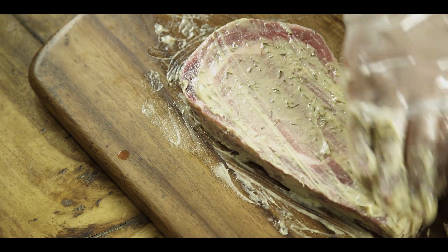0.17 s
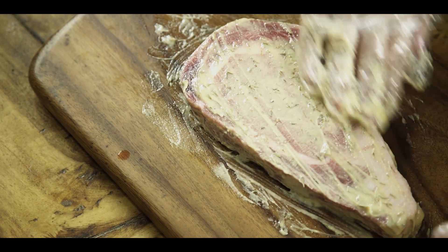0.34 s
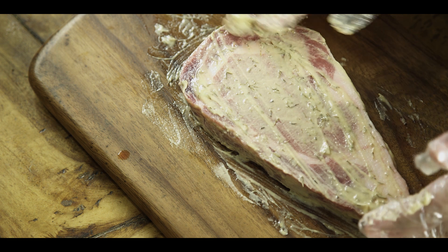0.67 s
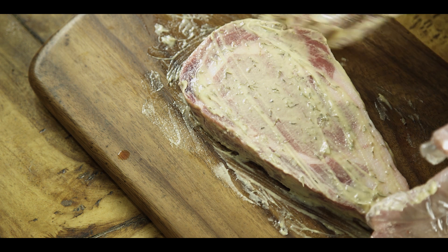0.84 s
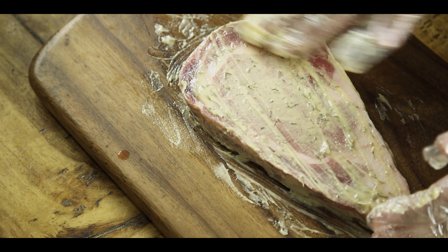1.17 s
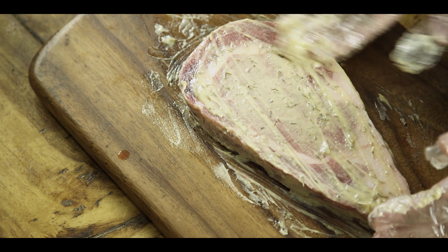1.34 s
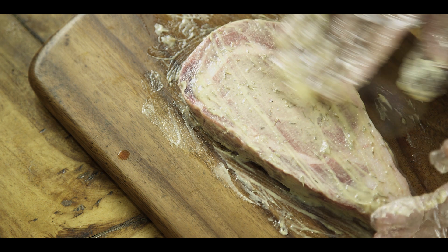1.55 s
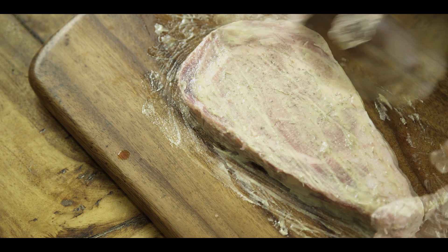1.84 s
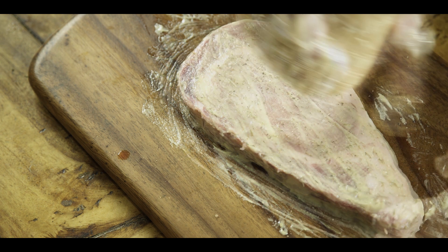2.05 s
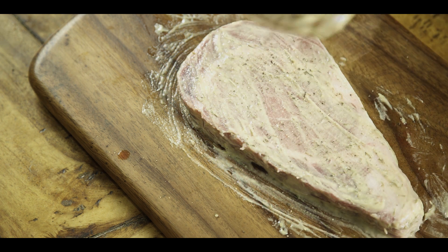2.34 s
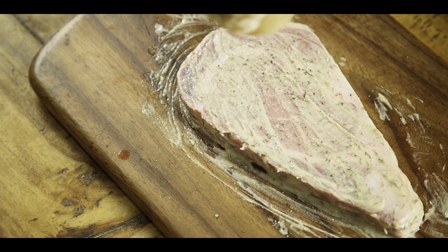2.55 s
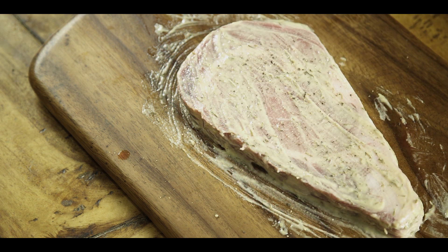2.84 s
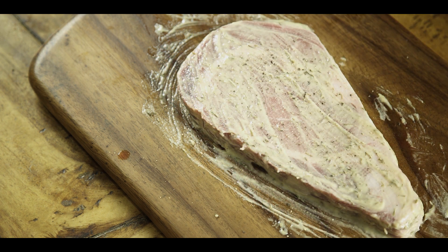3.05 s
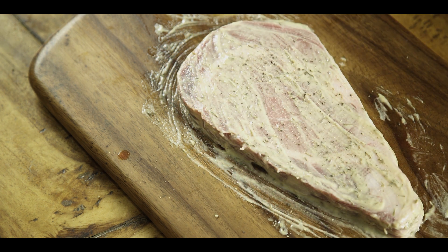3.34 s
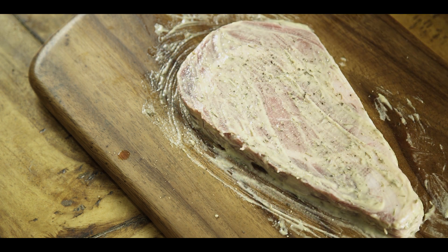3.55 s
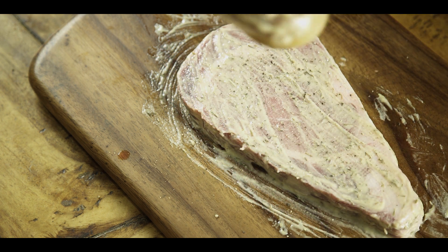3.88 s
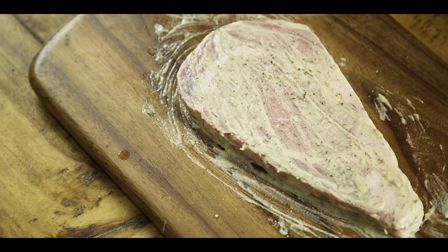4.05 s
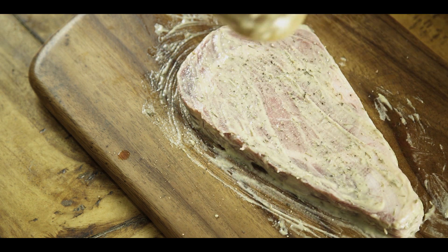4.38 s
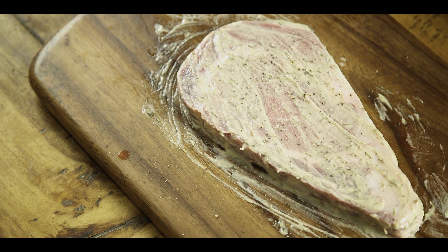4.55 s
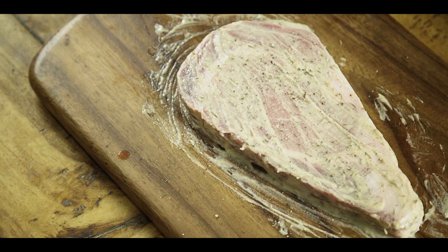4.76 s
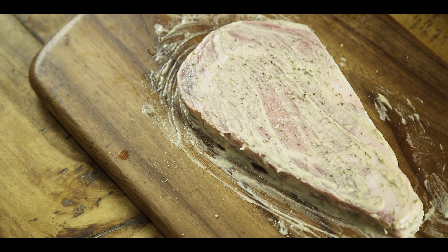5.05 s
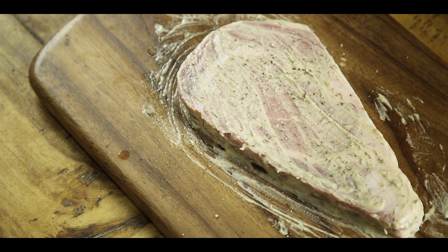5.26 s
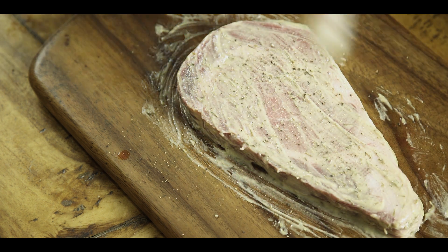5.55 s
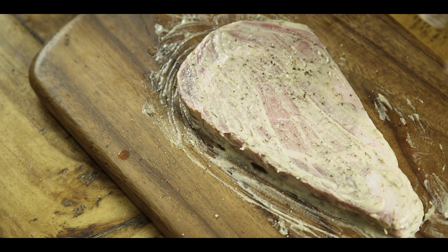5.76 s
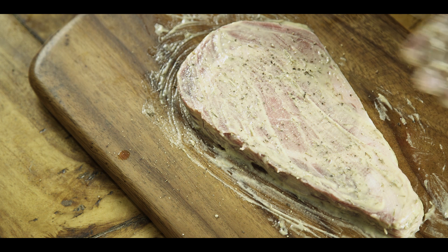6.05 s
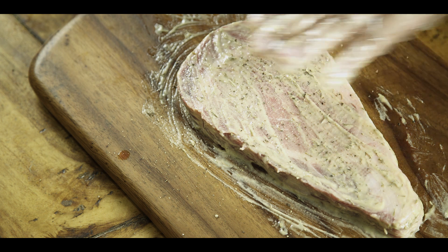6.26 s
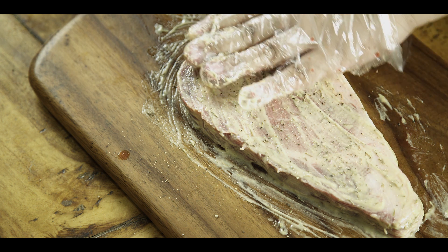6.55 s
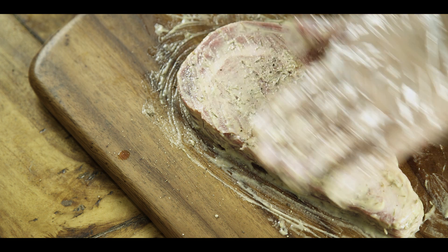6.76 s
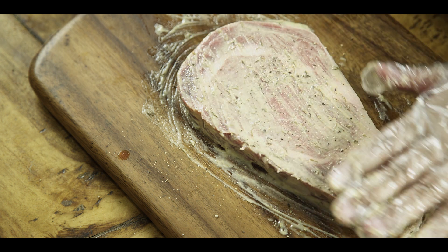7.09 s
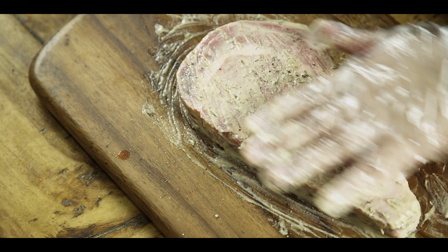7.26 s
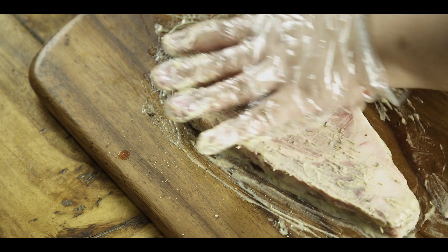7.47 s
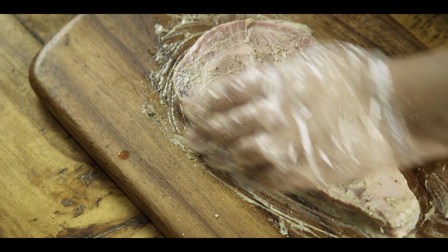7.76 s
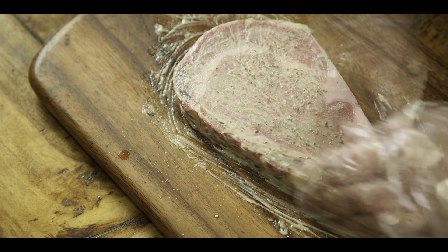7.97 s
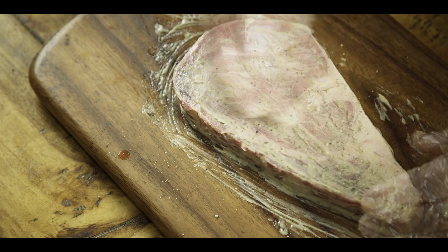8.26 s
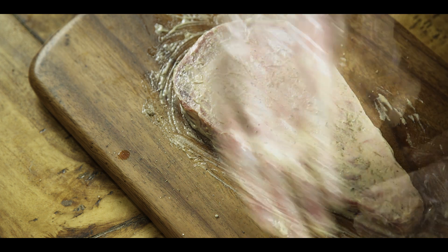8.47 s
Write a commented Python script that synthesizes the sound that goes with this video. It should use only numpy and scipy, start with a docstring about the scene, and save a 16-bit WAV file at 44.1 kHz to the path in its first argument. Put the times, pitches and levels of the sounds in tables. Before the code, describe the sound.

Close crinkling strokes of a plastic glove spreading wet paste over meat, with little air pops, squelches and a cutting board's knock.

```python
"""Close up in a quiet, faintly humming kitchen, a hand in a thin plastic glove rubs paste into a steak.
The film crinkles with every stroke. Soon trapped air pops under the fingers, the paste squishes and
squelches, and after five seconds air hisses in as the hand peels away. At six seconds the wooden
board knocks dully, rattles and settles with soft bumps; a few more strokes of the glove follow."""
import sys
import numpy as np
from scipy import signal
from scipy.fft import rfft, irfft
from scipy.io import wavfile

SR = 44100
rng = np.random.default_rng(int(sys.argv[2]) if len(sys.argv) > 2 else 0)


def output_pcm(signal):
    """Save a mono or channel-first signal as 16-bit PCM at the path in sys.argv[1].

    Samples are clipped to [-1, 1] before scaling.
    """
    pcm = np.clip(np.atleast_2d(signal).T, -1, 1) * 32767
    wavfile.write(sys.argv[1], SR, np.round(pcm).astype(np.int16))


N = 380583
T = np.arange(N) / SR


def glove(rub_db, taut_db, average_stroke_db=-47):
    """Film sticks and lets go in countless tiny snaps, denser in a fast stroke; creases crackle on top."""
    # tone of the rubbing film: frequency_hz, gain_db
    film_tone = [(200, -28), (380, -6.5), (550, -9), (850, -11.5), (1450, -6.5), (2200, -8), (3000, -4.5),
                 (3800, -3.5), (4600, -0.5), (6000, 0), (7200, -4.5), (8800, -7.5), (10200, -6.5),
                 (13000, -7.5), (15700, -17)]
    effort_db = rub_db - average_stroke_db
    speed = amp(0.6 * effort_db)
    sliding = unit(snaps(8000 * speed, spread_db=2.5) / np.sqrt(speed))
    # single creases stand out when the film is taut and moves slowly
    crease_gain = amp(-8.5 + 0.45 * taut_db) / np.sqrt(speed)
    creases = grains(2530, 13800, rate=700, cycles=5.1, spread_db=4.5)
    film = colour((sliding + crease_gain * creases) / np.hypot(1, crease_gain), film_tone)
    film /= np.std(butter(film, [3200, 8000], "band"))
    # a firm stroke brings out the rasp
    rasp = butter(film, [4600, 6400], "band", order=1)
    rasp_lift = amp(0.16 * effort_db) - 1
    # taut film snaps more sharply, and its tension keeps changing under the fingers
    sparkle = butter(butter(film, 8300, "high")[::-1], 8300, "high")[::-1]  # both ways: stays in phase
    sparkle_lift = amp(taut_db + 1.5 * wander(25)) - 1
    film = film + rasp_lift * rasp + sparkle_lift * sparkle
    # the glove catches and slips unevenly within a stroke
    grip_db = 1.21 * wander(60) + 0.7 * wander(22)
    return film * amp(rub_db - 0.15 - 0.094 * effort_db + grip_db)


def hand_motion(rest_db=-61):
    """Rubbing level and film tautness in dB, stroke by stroke; a light rustle stays in between."""
    # strokes of the hand, tautness as a lift of the top treble: middle_s, length_s, level_db, taut_db
    strokes = [(0.0, 0.15, -45.5, -3), (0.2, .13, -47.5, -2.5), (0.343, 0.044, -41.5, 5),
               (0.466, 0.21, -47, -1.5), (0.687, .125, -40, 1), (0.853, 0.078, -41.5, -3.5),
               (1.212, .22, -48.5, 4.5), (1.562, 0.13, -48.5, 3), (1.802, .11, -47.5, 3),
               (2.053, 0.11, -41, -2.5), (2.236, .12, -46.5, 0), (2.477, 0.085, -41.5, 0.5),
               (2.69, .13, -44.5, -0.5), (2.926, 0.099, -40.5, 1), (3.123, .11, -43, -1.5),
               (3.363, 0.13, -42.5, 0), (3.608, .14, -41, -2.5), (3.849, .12, -41.5, -1),
               (4.09, .16, -43.5, -1.5), (4.303, 0.11, -40.5, 0.5), (4.551, .17, -43, -0.5),
               (4.718, 0.095, -43.5, 2), (4.957, .19, -45, 0), (5.194, 0.14, -40, -1.5),
               (5.329, 0.078, -34.5, 0), (5.512, .11, -42, 2), (5.82, .34, -52.5, 0.5),
               (6.067, 0.019, -47.5, -4), (6.313, 0.14, -42.5, 0), (6.491, 0.12, -46, -4),
               (6.873, 0.37, -48.5, 1), (7.393, 0.35, -45.5, 0.5), (7.738, 0.14, -35.5, 1.5),
               (7.957, 0.22, -45.5, 0), (8.218, 0.22, -50, 2.5), (8.473, 0.12, -51, 5)]
    rub_db = movements([(s, length, db) for s, length, db, taut in strokes], rest_db)
    treble_db = movements([(s, length, db + taut) for s, length, db, taut in strokes], rest_db)
    return rub_db, treble_db - rub_db


def paste():
    """Small bubbles crackle in the pressed paste, with lower slurps from the hollow of the palm."""
    # presses into the paste: middle_s, length_s, level_db
    presses = [(2.265, .04, -51.5), (2.49, .08, -60.5), (2.72, 0.063, -52.5), (2.93, .07, -62),
               (3.15, 0.052, -49.5), (3.345, .04, -57), (3.655, 0.044, -49), (4.135, 0.059, -49.5),
               (4.57, .07, -48.5), (4.7, 0.067, -53), (4.98, 0.064, -49), (5.35, 0.027, -66),
               (5.56, 0.23, -60)]
    pressure = amp(movements(presses, rest_db=-77))
    fizz = grains(1300, 3100, rate=1500, cycles=9, spread_db=3, count=16)
    slurp = grains(390, 540, rate=330, cycles=4.7, spread_db=1.5, count=5)
    return pressure * (amp(0.5) * butter(fizz, 990, "high", order=4) + amp(-4) * slurp)


def air_pockets():
    """Trapped air bursts under the hand in sharp little pops and deeper squelches."""
    # air pockets and creases popping: start_s, peak_db, pitch_hz
    pops = [(1.4302, -30, 10440), (1.9863, -29, 6200), (2.003, -30, 5460), (2.4645, -19.5, 5700),
            (2.88, -21, 5440), (2.9581, -23, 5500), (3.5872, -25.5, 3200), (3.6685, -26, 2360),
            (4.0379, -25.5, 5400), (4.1532, -21, 4440), (4.2639, -19, 5570), (4.4962, -23, 4350),
            (4.5926, -25.5, 2700), (4.6715, -24, 3120), (5.1045, -21, 5070), (5.5827, -29, 2350),
            (5.7645, -33.5, 1700)]
    # paste squeezed out under the palm: start_s, peak_db, pitch_hz
    squelches = [(2.245, -36, 527), (2.464, -39, 560), (2.913, -38.5, 520), (3.129, -38.5, 496),
                 (4.112, -36.5, 490), (4.265, -39, 550), (4.591, -32.5, 462), (4.675, -38, 563),
                 (4.943, -36, 413)]
    sharp = bursts(pops, ring_s=0.00055, glide=0.028, tear_db=-5.5, tear_s=0.0014, fold_db=-15)
    deep = bursts(squelches, ring_s=0.0021, glide=-0.016, tear_db=-5, tear_s=0.01, fold_db=-18)
    return sharp + deep


def bursts(rows, ring_s, glide, tear_db, tear_s, fold_db):
    """A pocket tears open with a tick; it and the larger fold around it ring with a sliding pitch."""
    out, t = np.zeros(N), T[:SR // 20]
    for start_s, peak_db, pitch_hz in rows:
        sliding_hz = pitch_hz * (1 + glide * np.tanh(t / ring_s / 2))
        phase = 2 * np.pi * np.cumsum(sliding_hz) / SR
        tone = np.sin(phase) + amp(fold_db) * np.sin(0.64 * phase)
        ring = tone * t / ring_s * np.exp(1 - t / ring_s)
        band_hz = [pitch_hz / 3, min(1.1 * pitch_hz, SR / 3)]
        tear = unit(butter(rng.standard_normal(len(t)), band_hz, "band", order=1))
        burst = ring + amp(tear_db) * tear * np.exp(-t / tear_s)
        add(out, start_s, amp(peak_db) * burst / np.max(np.abs(burst)))
    return out


def suction():
    """Air hisses through a gap whose resonance glides as the hand peels away."""
    # narrowing or widening gaps in the paste: start_s, end_s, first_hz, last_hz, level_db
    gaps = [(5.112, 5.36, 2680, 2560, -51), (5.342, 5.362, 1542, 1256, -40), (5.47, 5.619, 1970, 2370, -47)]
    out = np.zeros(N)
    for start_s, end_s, first_hz, last_hz, level_db in gaps:
        pitch_hz = np.interp(T, [start_s, end_s], [first_hz, last_hz])
        flutter = butter(rng.standard_normal(N) + 1j * rng.standard_normal(N), 300, "low")
        hiss = unit(np.real(flutter * np.exp(2j * np.pi * np.cumsum(pitch_hz) / SR)))
        progress = np.interp(T, [start_s, end_s], [0, 1])
        opening = np.sqrt(np.abs(np.sin(np.pi * progress)))
        out += amp(level_db) * opening * hiss
    return out


def board():
    """Each contact rings the same wooden modes; soft bumps favour the lowest, damped by the hand."""
    # the board knocks, rattles and settles: start_s, level_db, centre_hz, ring_time_ratio
    knocks = [(6.0827, -5.5, 390, 1.03), (6.1035, -22.5, 197, 1.4), (6.1332, -24, 406, 0.74),
              (6.146, -29, 493, 1.45), (6.17, -23.5, 476, 0.42), (6.196, -40, 351, 1.1),
              (6.33, -22.5, 150, 0.4), (6.352, -26, 147, 0.27), (6.458, -25, 151, 0.23)]
    # modes of board and counter: pitch_hz, level_db, t60_s
    modes = [(144, -22, 0.26), (214.6, -4, 0.3), (261, -0.5, 0.061), (307, -6, 0.096), (378, -17, 0.24),
             (405.6, -7.5, 0.081), (511, -10, 0.15), (547, -4.5, 0.055), (592, -12.5, 0.087),
             (665, -7, 0.077), (763, -3, 0.044), (870, -22, 0.155), (1000, -37, 0.025), (1255, -8.5, 0.038),
             (1730, -12, 0.031)]
    out, t = np.zeros(N), T[:SR // 2]
    pitch_hz, mode_db, t60_s = np.transpose(modes)[:, :, None]
    for start_s, level_db, centre_hz, ring_time_ratio in knocks:
        drive = 1 / (1 + np.log2(pitch_hz / centre_hz) ** 2)
        rings = np.sin(2 * np.pi * pitch_hz * t) * np.exp(-np.log(1000) * t / (t60_s * ring_time_ratio))
        # the duller the contact, the longer its push takes to build
        push = 1 - np.exp(-2 * centre_hz * t)
        add(out, start_s, push * np.sum(amp(level_db + mode_db) * drive * rings, axis=0))
    # the board is too small to radiate deep bass
    thud = butter(butter(out, 150, "high", order=3), 2600, "low")
    return room(thud, t60_s=0.46, wet_db=-8.5, delay_s=0.011)


def room(x, t60_s, wet_db, delay_s=0.0033):
    """Direct sound and a diffuse tail from the kitchen walls."""
    t = T[:SR // 2]
    tail = rng.standard_normal(len(t)) * np.exp(-np.log(1000) * t / t60_s) * (t > delay_s)
    return x + amp(wet_db) * signal.fftconvolve(x, tail / np.linalg.norm(tail))[:N]


def kitchen():
    """A steady bed of low room tone and mains hum."""
    # room tone of the quiet kitchen: frequency_hz, gain_db
    room_tone = [(20, -7.5), (45, -11.5), (100, -1), (145, 0), (180, -6), (215, 2), (290, 1.5), (400, -4.5),
                 (700, -8.5), (2000, -14), (6000, -18.5), (15000, -48)]
    # partials of the mains hum: pitch_hz, rms_db
    partials = [(59.6, -68.5), (181, -67), (301, -71)]
    air = unit(colour(rng.standard_normal(N), room_tone, size=8192))
    hum = sum(amp(db) * np.sqrt(2) * np.sin(2 * np.pi * (hz * T + rng.random())) for hz, db in partials)
    return amp(-55.5) * air + hum


def movements(rows, rest_db, rise_steepness=5.15, fall_steepness=3.72):
    """Level in dB of overlapping hand movements: each gathers, holds and lets go a little more slowly."""
    coarse_t = T[::32]
    power = amp(rest_db) ** 2
    for middle_s, length_s, level_db in rows:
        distance = np.abs(coarse_t - middle_s) / (length_s / 2)
        steepness = np.where(coarse_t < middle_s, rise_steepness, fall_steepness)
        power = power + amp(level_db) ** 2 / (1 + distance ** steepness)
    return np.interp(T, coarse_t, 10 * np.log10(power))


def grains(low_hz, high_hz, rate, cycles, spread_db, count=12):
    """Tiny cavities of many sizes, each ringing for a few cycles when it snaps."""
    out = 0
    for hz in np.geomspace(low_hz, high_hz, count):
        pole = np.exp((2j * np.pi - np.pi / cycles) * hz / SR)
        out = out + unit(signal.lfilter([1], [1, -pole], snaps(rate / count, spread_db)).imag)
    return unit(butter(out, low_hz / 2, "high"))


def snaps(rate, spread_db):
    """Random clicks, rate a second: many small ones and a few large."""
    hit = rng.random(N) < rate / SR
    size = amp(spread_db * np.minimum(rng.exponential(size=N), 4))
    return hit * size * rng.choice([-1, 1], N)


def wander(rate):
    """Random drift of rms 1, turning rate times a second."""
    return unit(np.interp(T * rate, np.arange(N // 20), rng.standard_normal(N // 20)))


def colour(x, points, size=1024):
    """Minimum-phase EQ through (frequency_hz, gain_db) points."""
    hz, db = np.transpose(points)
    bins = np.maximum(np.fft.rfftfreq(size, 1 / SR), 1)
    cepstrum = irfft(np.log(amp(np.interp(np.log(bins), np.log(hz), db))))
    cepstrum[1:size // 2] *= 2
    cepstrum[size // 2 + 1:] = 0
    return signal.fftconvolve(x, irfft(np.exp(rfft(cepstrum))))[:len(x)]


def butter(x, hz, kind, order=2):
    """Plain low-, high- or band-pass."""
    return signal.sosfilt(signal.butter(order, hz, kind, fs=SR, output="sos"), x)


def amp(db):
    """Decibels to gain."""
    return 10 ** (np.asarray(db) / 20)


def unit(x):
    """Scale to rms 1."""
    return x / np.sqrt(np.mean(x ** 2))


def add(out, start_s, sound):
    """Drop a short sound into the mix."""
    start = int(start_s * SR)
    out[start:start + len(sound)] += sound[:N - start]


def scene():
    """Mono mix: the hand up close, the board, and the kitchen underneath."""
    rub_db, taut_db = hand_motion()
    hand = glove(rub_db, taut_db) + paste() + air_pockets() + suction()
    return (room(hand, t60_s=0.16, wet_db=-15.5) + board() + kitchen())[None]


def record(dry, cutoff_hz=15700):
    """A steep low-pass trims the very top."""
    return signal.sosfilt(signal.ellip(10, 0.2, 80, cutoff_hz, fs=SR, output="sos"), dry)


dry = scene()
out = record(dry)
output_pcm(out)
```